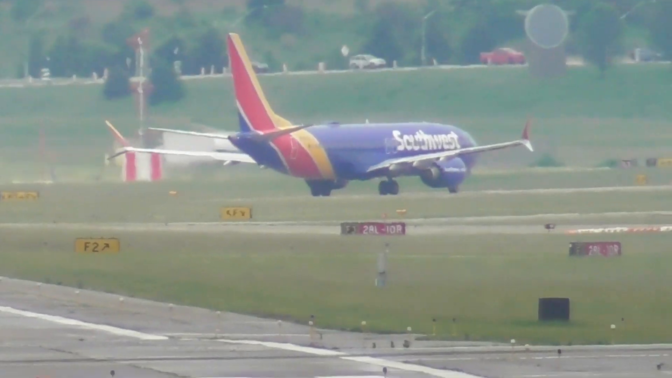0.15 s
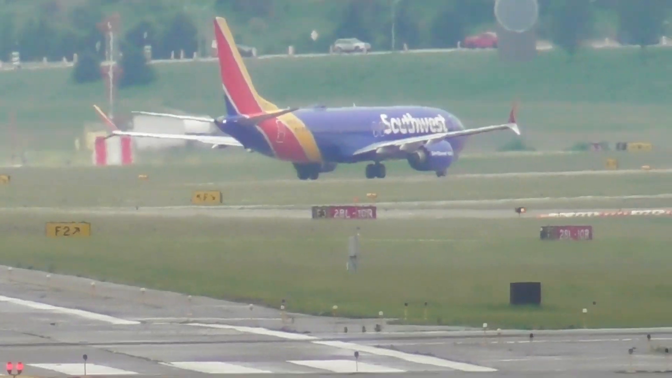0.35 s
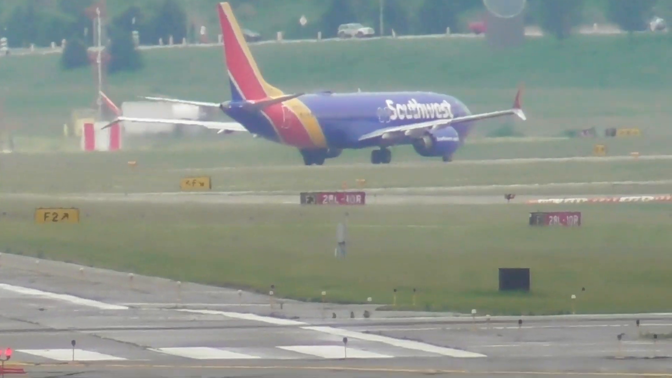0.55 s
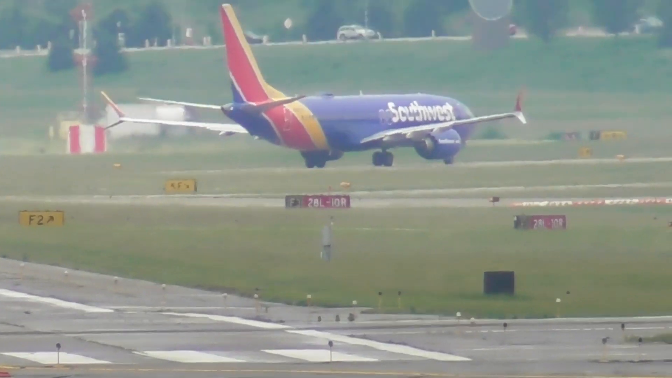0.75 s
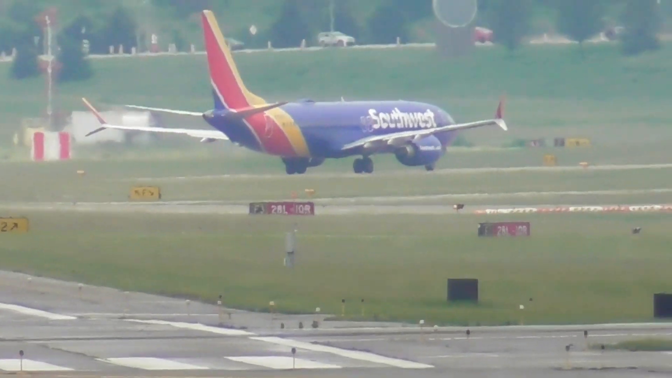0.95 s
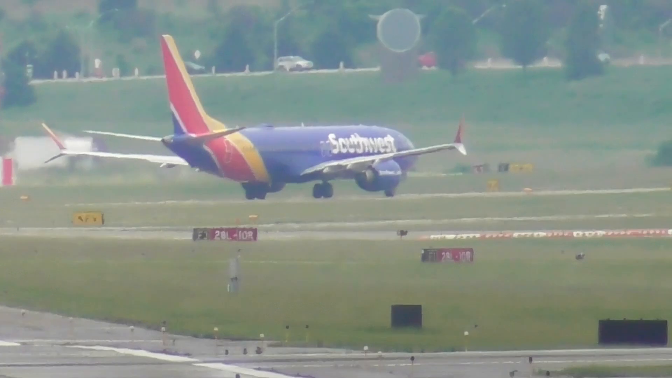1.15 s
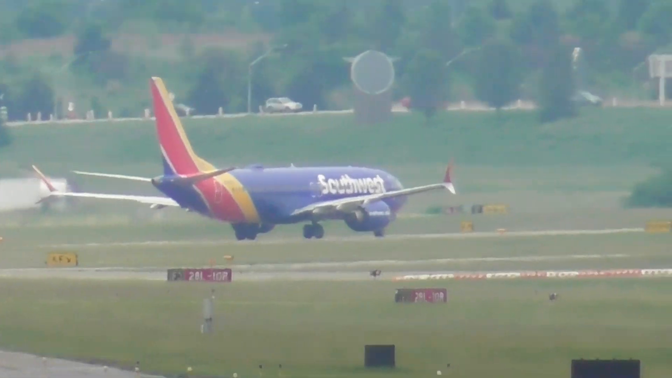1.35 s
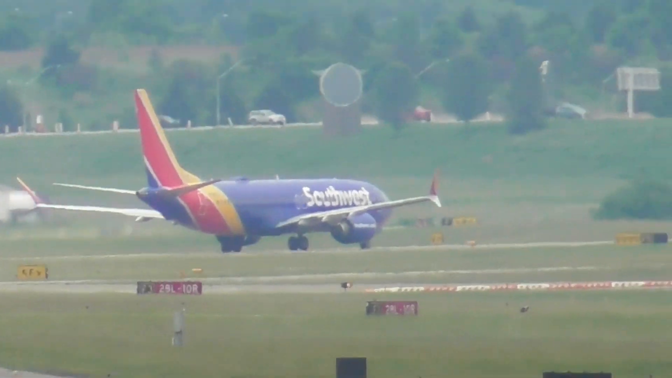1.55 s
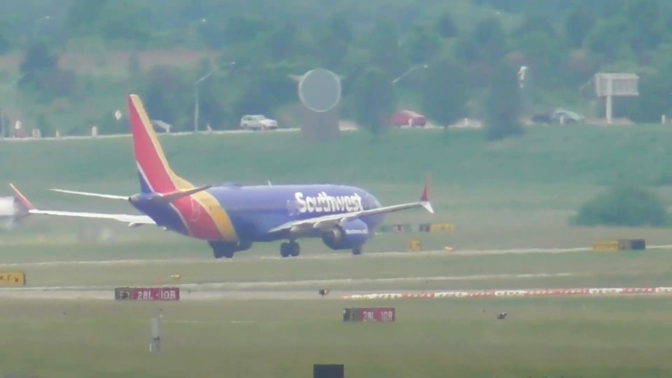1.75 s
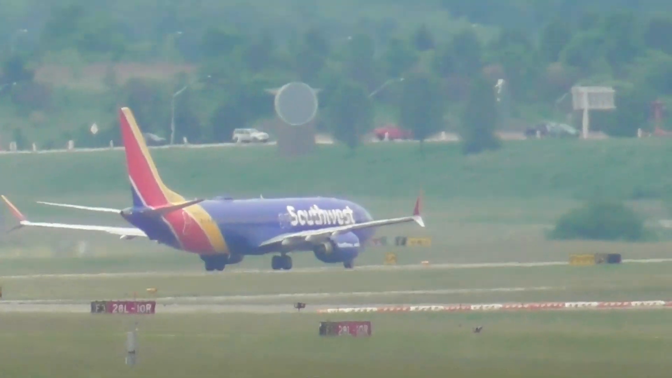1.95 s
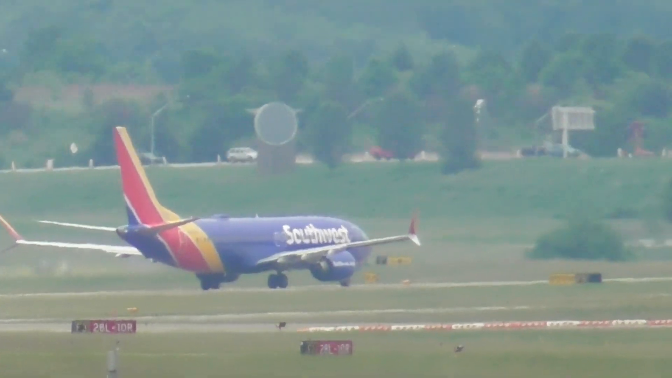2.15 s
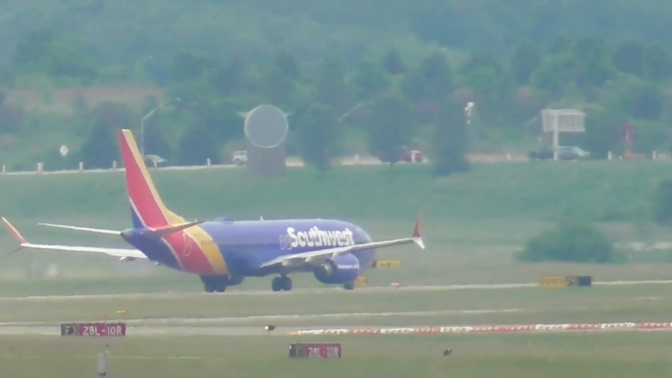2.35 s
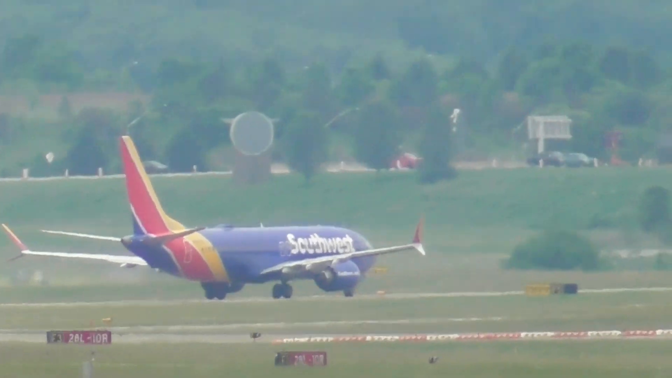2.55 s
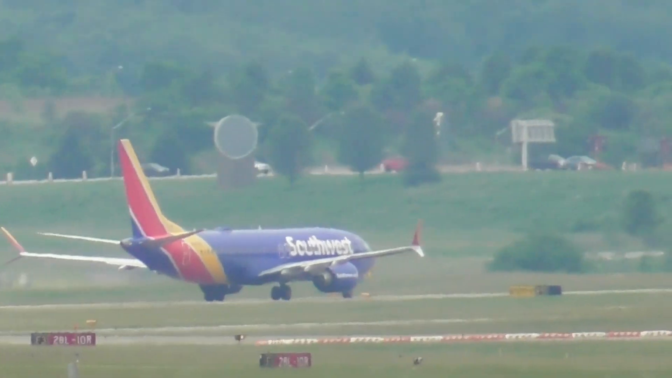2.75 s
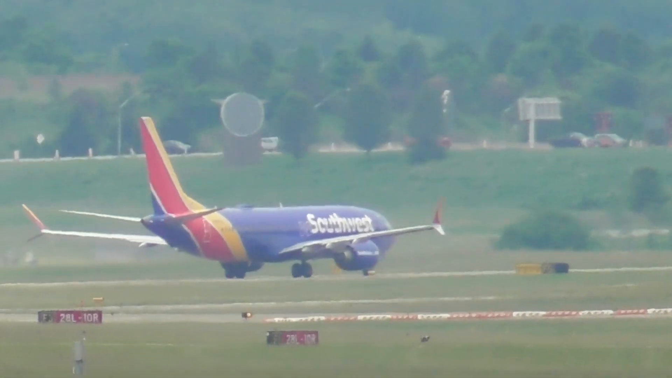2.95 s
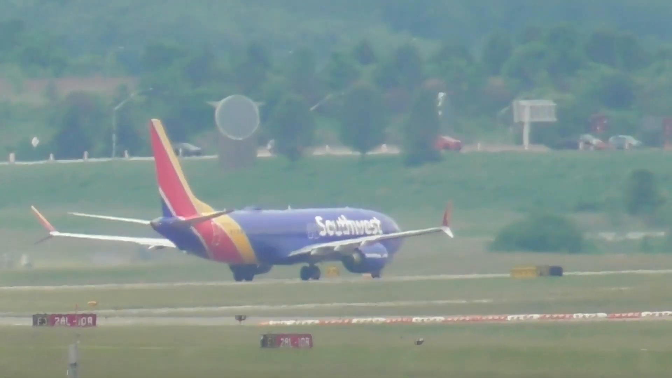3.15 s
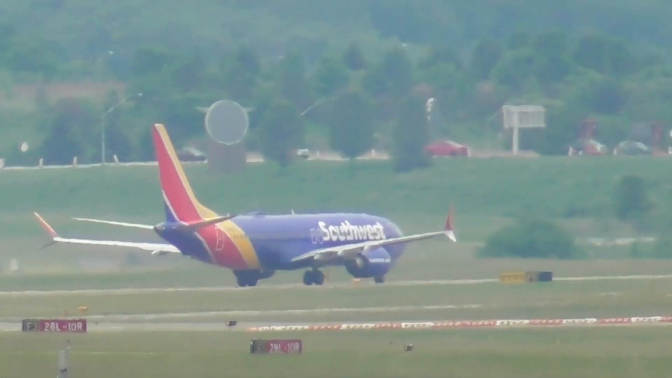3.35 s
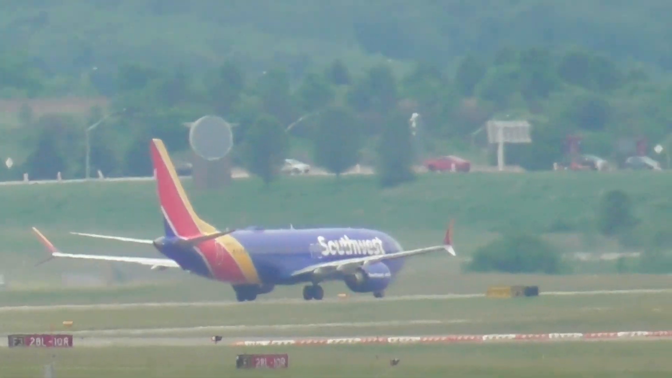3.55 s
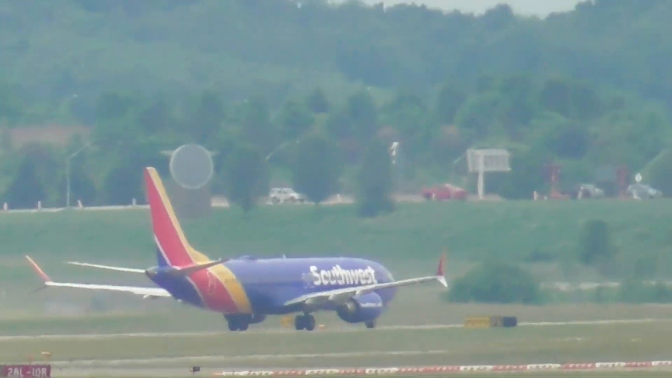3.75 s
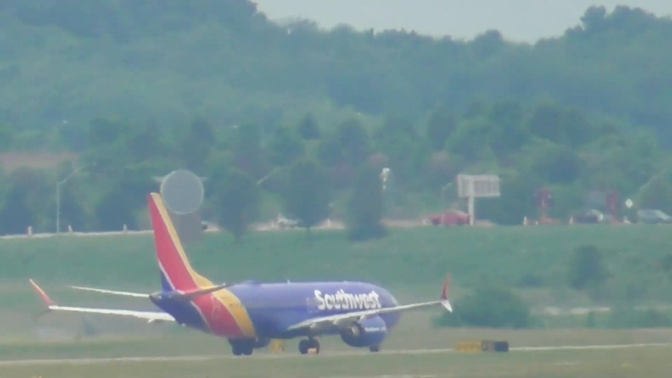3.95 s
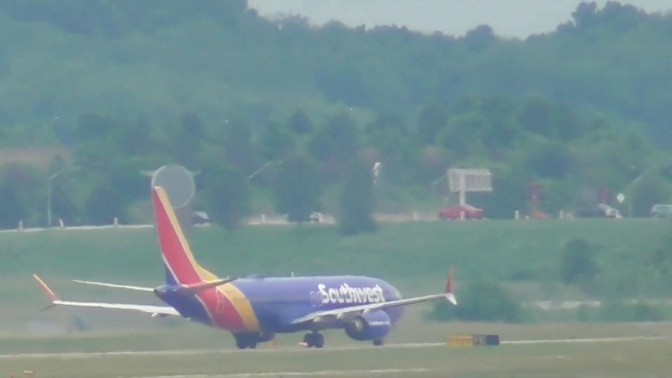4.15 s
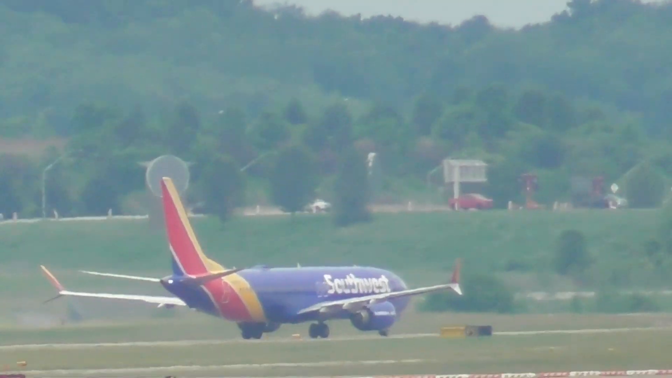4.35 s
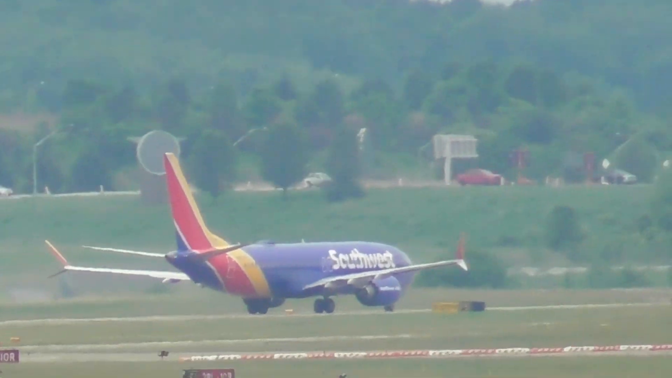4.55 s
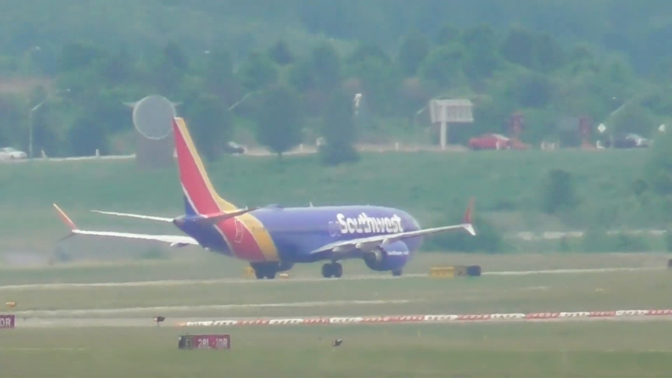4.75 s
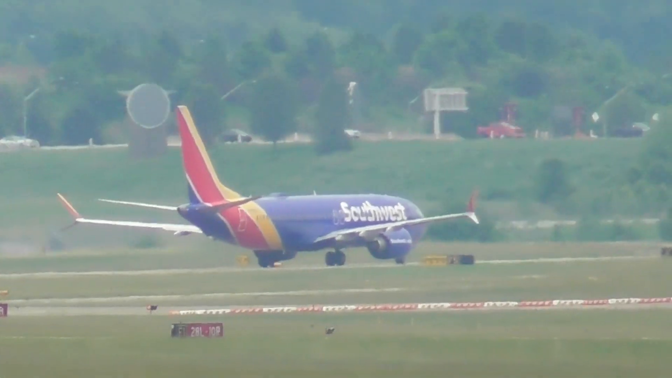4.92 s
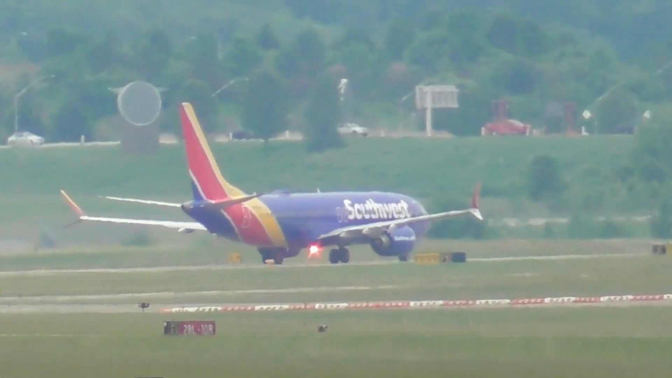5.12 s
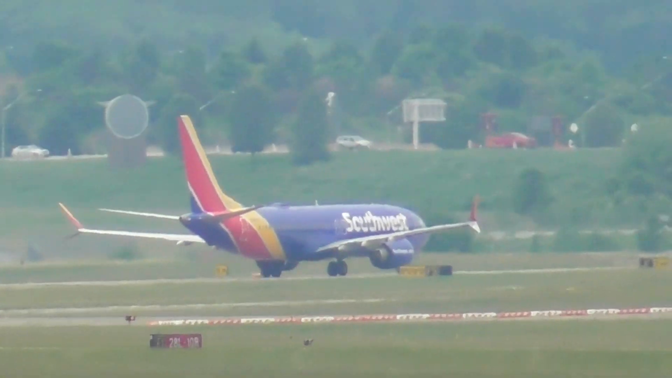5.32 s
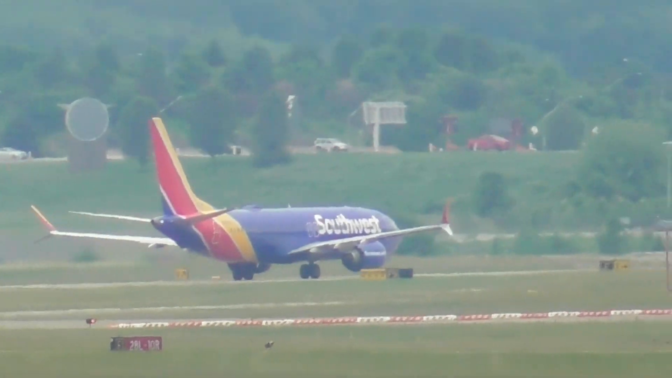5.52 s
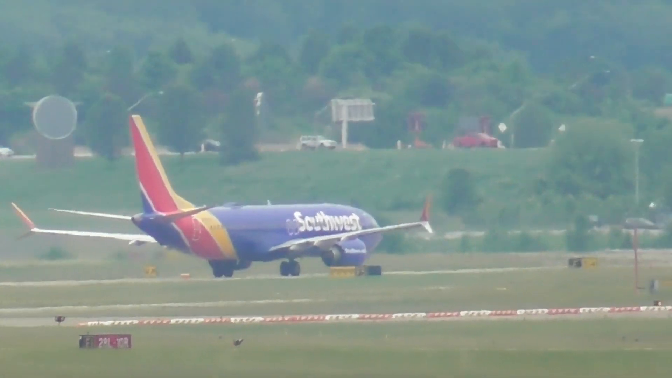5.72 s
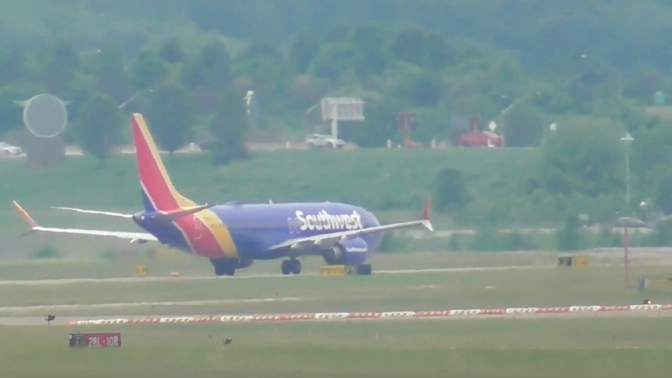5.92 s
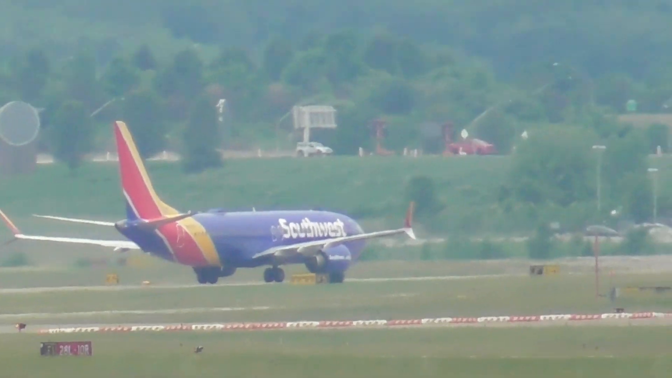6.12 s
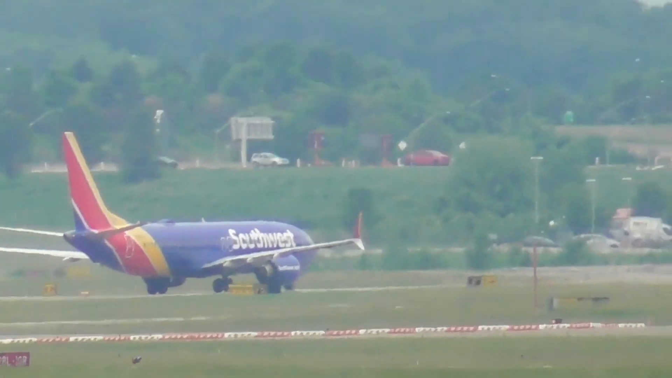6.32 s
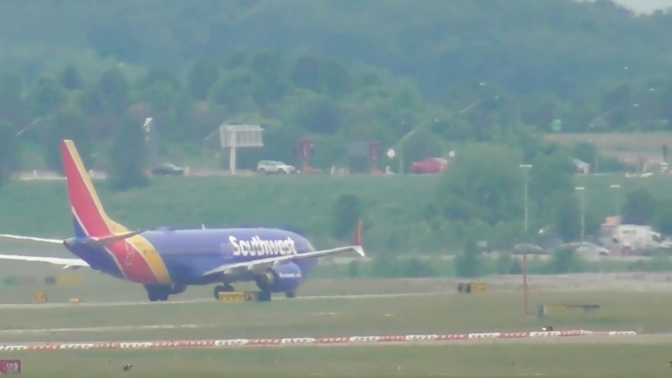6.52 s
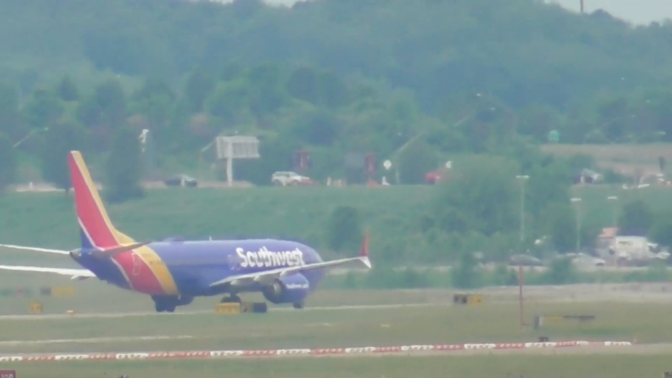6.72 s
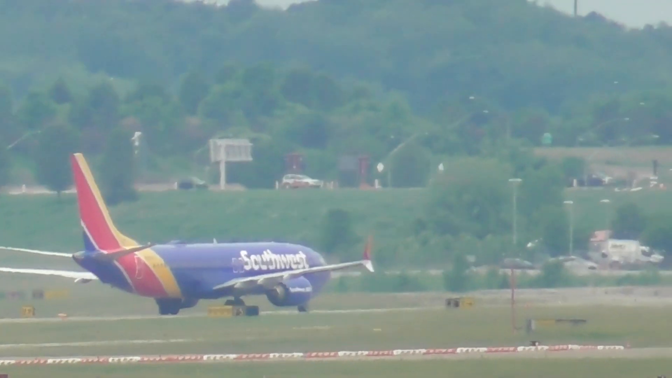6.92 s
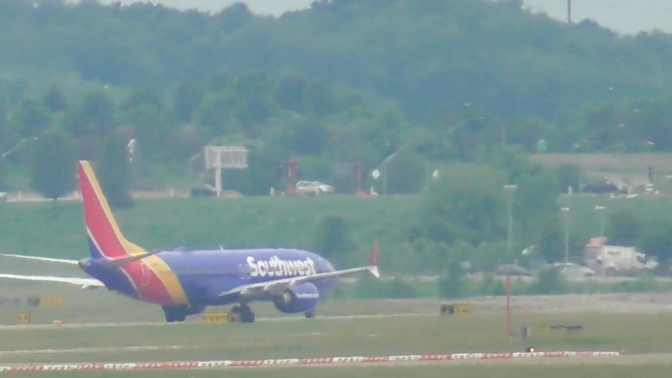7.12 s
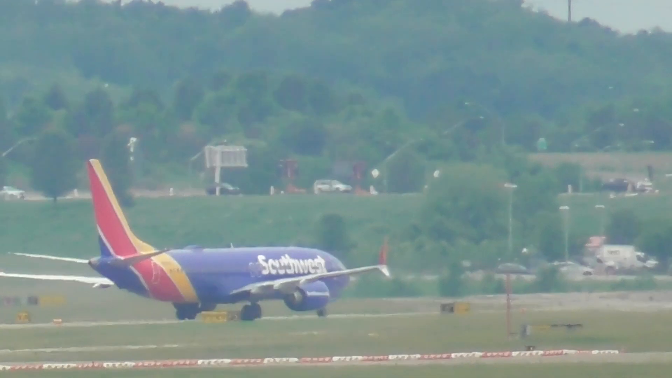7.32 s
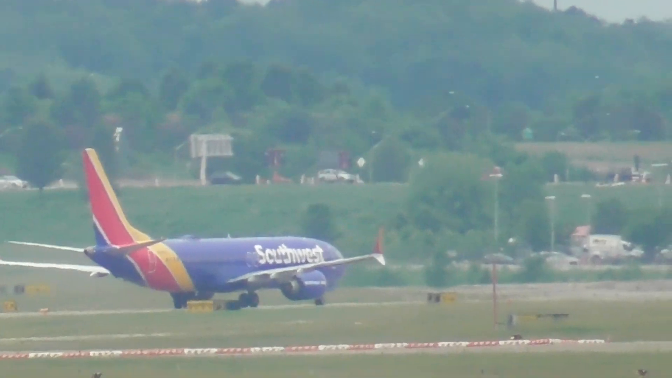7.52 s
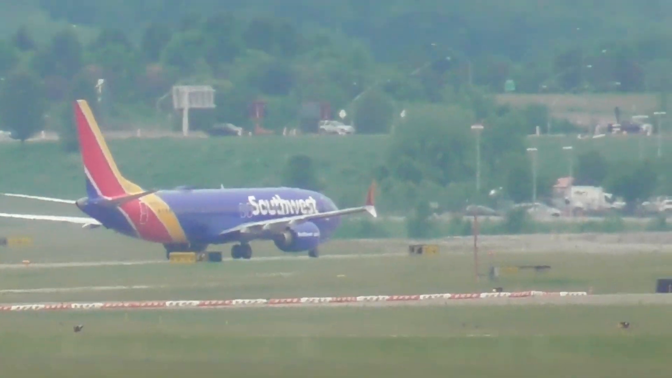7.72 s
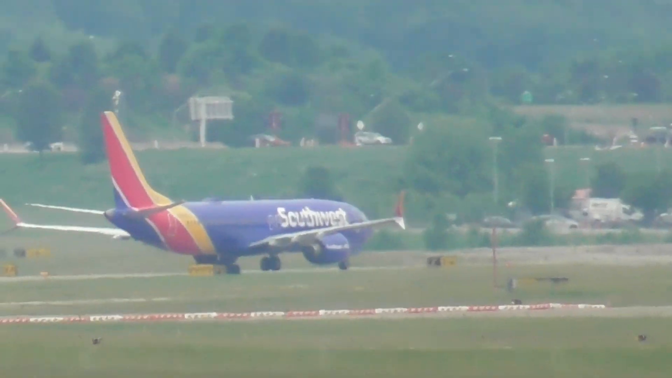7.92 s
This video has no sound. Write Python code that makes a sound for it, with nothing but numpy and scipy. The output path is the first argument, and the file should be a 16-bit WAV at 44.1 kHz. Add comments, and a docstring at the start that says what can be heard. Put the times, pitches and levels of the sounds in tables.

```python
"""First comes the dull roar of a distant jet over a field, where crickets trill and birds call.
The crickets sing with quick wing strokes; the birds whistle and chirp; something ticks like a twig.
A road vehicle draws near with tyre roar and a low engine hum, and its hiss opens up as it comes
alongside on the left. Two close microphones hear the bass mostly on the left."""
import sys
import numpy as np
from scipy import signal
from scipy.io import wavfile
from scipy.ndimage import uniform_filter1d, map_coordinates

SR = 44100
rng = np.random.default_rng(int(sys.argv[2]) if len(sys.argv) > 2 else 0)


def master(y):
    """Save y as 16-bit WAV."""
    cut = np.clip(np.atleast_2d(y).T, -1, 1)
    pcm = np.round(cut * 32767)  # scale
    wavfile.write(sys.argv[1], SR, pcm.astype(np.int16))


N = 351459
SIDES = np.array([[1], [-1]])  # left, right


def undb(db):
    """Turn decibels into a gain."""
    return 10 ** (np.asarray(db) / 20)


def wander(rate, size=N, count=1):
    """Random curves as long as the scene, gliding to a new value about `rate` times a second."""
    hold = max(int(size * SR / N / rate), 1)
    steps = np.repeat(rng.standard_normal((count, size // hold + 1)), hold, axis=1)
    return 1.2 * uniform_filter1d(steps, hold, axis=1)[:, :size]


# A colour table describes a noise. Each row: frequency in Hz, relative level in dB, left minus right
# in dB, left's lead in radians, how alike the sides are (1 or more is the same, -1 or less is opposite).
def roar(colour, times, db, tilt=0., howl=None, flicker_db=1.):
    """Broad stereo noise; turbulent air lets neighbouring bands swell and sink on their own."""
    freq, t, noise = signal.stft(rng.standard_normal((2, N)), SR, nperseg=1024)
    hz, *columns = np.transpose(colour)
    octave = np.log2(np.maximum(freq, 10))
    shape_db, pan_db, lead, alike = (np.interp(octave, np.log2(hz), c)[:, None] for c in columns)
    alike = np.clip(alike, -1, 1)
    shape_db = shape_db - 10 * np.log10(np.mean(undb(2 * shape_db)))
    drift = wander(6, size=len(t), count=12)  # one curve per octave
    band = np.clip(octave - 4, 0, 11)
    drift = map_coordinates(drift, np.meshgrid(band, np.arange(len(t)), indexing="ij"), order=1)
    treble_octaves = np.clip(octave - np.log2(500), 0, 3)[:, None]
    treble_db = treble_octaves * np.interp(t, times, tilt + np.zeros(len(times)))
    gain = undb(shape_db + np.interp(t, times, db) + treble_db + flicker_db * drift)
    if howl:
        # the tread grooves ring in a band that slides as the vehicle passes
        centre_hz, boost_db = (np.interp(t, times, c) for c in howl)
        gain = gain * undb(boost_db * np.exp(-((freq[:, None] / centre_hz - 1) / 0.088) ** 2))
    left = noise[0] * undb(pan_db / 2) * np.exp(1j * lead)
    right = (alike * noise[0] + np.sqrt(1 - alike ** 2) * noise[1]) * undb(-pan_db / 2)
    return signal.istft(gain * np.array([left, right]), SR, nperseg=1024)[1][:, :N]


def scatter(sound, tail_s, tail_db):
    """Grass, trees and distance scatter a sound into a short, blurred tail."""
    t = np.arange(int(tail_s * SR)) / SR
    tail = rng.standard_normal(len(t)) * np.exp(-np.log(1000) * t / tail_s)
    tail = tail * undb(tail_db) / np.sqrt(np.sum(tail ** 2))
    return sound + signal.fftconvolve(np.atleast_2d(sound), tail[None], axes=1)[:, :N]


# The jet's dull sound, as a colour table (see roar).
JET_COLOUR = [(25, -18, 14, -1.4, .9), (45, -4.5, 12.5, -0.29, .9), (96, 2, 9.5, -1.3, 0.92),
              (264, -6.5, 7.5, -0.88, 1), (400, -10.5, 5.5, -0.87, 0.78), (893, -11, 3, -0.77, 0.7),
              (1270, -21.5, -2, -0.89, 0.65), (2050, -23.5, -4, 0.038, 0.81), (3350, -38, 1.5, 0.46, 1),
              (5150, -63, -4, 0, 1), (6560, -51.5, 1, 0, 1), (8700, -40.5, -5, -0.096, 0.82),
              (10300, -50, 0, 0, 0.13), (15500, -54, 16, .5, 0.58)]
# The jet rolling away. Each row: time in seconds, level in dB, treble tilt in dB per octave.
JET_PATH = [(0, -41, 2.5), (1.5, -40.5, 0.5), (4, -39.5, 2), (8, -44, 1)]


def distant_jet():
    """A far-off roar that swells a little, then fades."""
    return roar(JET_COLOUR, *np.transpose(JET_PATH), flicker_db=0.5)


# The far crickets' narrow, high band, as a colour table (see roar).
CHORUS_COLOUR = [(3500, -26, 0, 0, .99), (4050, -11, 0, 0, .99), (4280, 4.5, -0.58, 0.018, 0.95),
                 (4970, -12, 0, 0, 0.94), (5070, -32, 0, 0, 0.96)]


def cricket_chorus():
    """Many far crickets blur into noise."""
    return roar(CHORUS_COLOUR, [0], [-52], flicker_db=2)


# The near crickets. Each row: strokes per second, top pitch in Hz, level in dB,
# left minus right for the overtones in dB, start in strokes, unsteadiness in strokes.
CRICKET_SINGERS = [(30.87, 4505, -48, -6.5, 0.017, .02), (30.4, 4495, -52, -3.5, -0.077, 0.056),
                   (28.4, 4510, -53, -1, 0.503, 1.5)]
# The tones in a stroke. Each row: multiple of the pitch, level in dB.
STROKE_TONES = [(1, 1.5), (2, -10), (3, -24)]


def near_crickets():
    """Each wing stroke is a short falling tone; two steady singers drift in and out of step, one wavers."""
    t = np.arange(N) / SR
    out = np.zeros((2, N))
    for rate, top_hz, db, pan_db, start, unsteady in CRICKET_SINGERS:
        strokes = t * rate - start + unsteady * wander(3)[0]
        progress = np.clip(strokes % 1 / .72, 0, 1)  # sounds for 72% of each cycle
        hz = top_hz * (1 - .065 * progress ** 2 + .004 * wander(120)[0])  # a fall and a slight rasp
        phase = 2 * np.pi * np.cumsum(hz) / SR
        loudness = np.sin(np.pi * progress ** .8) * undb(db + 3 + 1.2 * wander(30)[0])
        for k, tone_db in STROKE_TONES:
            pan = SIDES * pan_db * (k > 1)  # only the overtones' short waves tell the microphones apart
            out += loudness * undb(tone_db + pan / 2) * np.sin(k * phase + .1 * (k - 1) * pan)
    return scatter(out, tail_s=.14, tail_db=-7)


def bird_note(start_s, progress, hz, db, husk=0, tones=((1, 0),)):
    """One note that swells and fades; the faster flutter of its pitch is what sounds husky."""
    here = slice(int(start_s * SR), int(start_s * SR) + len(progress))
    flutter = (.006 + 0.14 * husk) * wander(1200)[0, here]
    phase = 2 * np.pi * np.cumsum(hz * (1 + flutter)) / SR
    voice = sum(undb(tone_db) * np.sin(k * phase) for k, tone_db in tones)
    out = np.zeros(N)
    out[here] = voice * np.sin(np.pi * progress) ** .6 * undb(db + 3 + 1.8 * wander(90)[0, here])
    return out


# Whistled notes. Each row: start and length in seconds, first, middle and last pitch in Hz, level in dB.
WHISTLE_NOTES = [(.24, .05, 3270, 2970, 2750, -64), (.445, .11, 3200, 2600, 2780, -58),
                 (.67, .085, 2400, 2470, 2300, -62), (.865, .095, 2500, 3070, 2520, -59),
                 (1.024, .045, 2750, 3000, 3150, -64), (1.29, 0.04, 3500, 3420, 3050, -65),
                 (1.4, .03, 7300, 6900, 6250, -72), (1.622, .09, 2800, 4120, 3070, -58),
                 (2.315, .04, 3560, 3100, 2780, -65), (2.34, .03, 2600, 2620, 2700, -61),
                 (2.594, 0.03, 3420, 3600, 3600, -63), (2.845, .07, 7100, 7100, 7100, -69.5),
                 (3.27, .07, 7080, 7080, 7080, -68), (3.61, 0.032, 2480, 2460, 2480, -55),
                 (5.36, 0.026, 3270, 3200, 3150, -59), (5.63, .065, 3550, 3450, 3550, -61),
                 (6.56, 0.029, 3240, 3200, 3000, -53)]


def bird_whistles():
    """Pure tones, each bent through three pitches."""
    out = np.zeros(N)
    for start_s, length_s, *pitches, db in WHISTLE_NOTES:
        progress = np.arange(0, 1, 1 / (length_s * SR))
        bend = np.polyfit([0, .5, 1], pitches, 2)
        out += bird_note(start_s, progress, np.polyval(bend, progress), db)
    return out


# Sparrow-like chirps. Each row: start and length in seconds, first and top pitch in Hz, level in dB,
# starting huskiness from 0 to 1.
CHIRP_NOTES = [(0.402, .041, 2300, 2500, -64, .9), (1.084, .046, 2090, 2490, -62, 1),
               (2.134, .063, 3500, 3700, -64, 0.4), (3.945, .084, 3100, 3500, -59, 0.54),
               (4.655, .105, 2990, 3800, -54.5, 0.24), (4.814, 0.076, 3010, 3430, -54, 0.4),
               (5.008, .1, 3070, 3370, -56.5, 0.05), (5.178, .1, 3090, 3400, -55, 0.08),
               (5.333, 0.095, 3080, 3550, -57, 0.14), (5.488, .067, 3100, 3500, -56, .4)]
# The tones in a chirp. Each row: multiple of the pitch, level in dB.
CHIRP_TONES = [(1, -2.5), (2, 2.5), (2.5, -8), (3, -22)]


def bird_chirps():
    """The pitch holds, climbs just before halfway and holds again, while the voice turns husky."""
    out = np.zeros(N)
    for start_s, length_s, first_hz, top_hz, db, husk in CHIRP_NOTES:
        progress = np.arange(0, 1, 1 / (length_s * SR))
        climb = np.sin(np.interp(progress, [.38, .5], [0, np.pi / 2])) ** 2
        hz = first_hz + (top_hz - first_hz) * climb
        out += bird_note(start_s, progress, hz, db, husk + 1.1 * progress ** 3, CHIRP_TONES)
    return out


# A tick close by. Each row: start in seconds, level in dB, rough length in milliseconds.
TWIG_TICKS = [(.333, -31, 2.2)]


def twig_tick():
    """A soft, twig-like click: a burst of noise with a brief tone for body."""
    out, t = np.zeros(N), np.arange(900) / SR
    for start_s, db, length_ms in TWIG_TICKS:
        click = uniform_filter1d(rng.standard_normal(len(t)), size=3) + 1.8 * np.sin(2 * np.pi * 1000 * t)
        age = 1000 * t / length_ms
        start = int(start_s * SR)
        out[start:start + len(t)] += undb(db) * click * age * np.exp(1 - 2 * age)
    return out


# The engine's loudness. Each row: time in seconds, level in dB.
ENGINE_LEVELS = [(3, -75), (4, -57), (5, -44.5), (6.3, -46), (7.1, -34.5), (7.7, -32.5), (7.8, -52),
                 (7.97, -50)]
# The tones in its hum. Each row: multiple of the firing rate, level in dB.
ENGINE_TONES = [(1, -1.5), (2, -9.5), (3, -8)]


def engine():
    """The engine's firing makes a low hum on the left that sags in pitch as the vehicle comes level."""
    t = np.arange(N) / SR
    firing_hz = 45 - 1.4 * (t - 4)
    phase = 2 * np.pi * np.cumsum(firing_hz * (1 + 0.01455 * wander(5)[0])) / SR
    hum = sum(undb(db) * np.sin(k * phase) for k, db in ENGINE_TONES)
    return hum * undb(np.interp(t, *np.transpose(ENGINE_LEVELS)) + SIDES * 12.5 / 2)


# The bright hiss, as a colour table (see roar).
HISS_COLOUR = [(3500, -25, 0, 0, 1), (5460, -1.5, 0, 0, 1), (7240, 2, 0.5, 0, 1), (8100, -0.5, 5, 0, 0.81),
               (8730, -0.5, 2, 0, -0.41), (9700, -4, 4.5, 0, -0.42), (10900, -7, -1, 0, -1.27),
               (12500, -11, 2, 0, -0.69), (15700, -20, -1, 0, -1.6)]
# Its loudness. Each row: time in seconds, level in dB.
HISS_LEVELS = [(0, -95), (3.5, -80), (4.3, -67), (5.6, -63.5), (6.7, -72), (6.95, -50), (7.97, -38.5)]


def road_hiss():
    """Hiss that leaps up as the vehicle arrives; above 9 kHz the two sides tend to move oppositely."""
    return roar(HISS_COLOUR, *np.transpose(HISS_LEVELS), flicker_db=0.5)


# The tyres, muffled far off and open close by, as colour tables (see roar).
MUFFLED_COLOUR = [(25, -21, 13, -1.3, .97), (60, -4, 16, -0.2, 0.71), (199, 1, 12.5, -1.45, 0.95),
                  (404, -6.5, 6, -0.7, 0.83), (680, -6.5, 2.5, -1.0, 0.96), (960, -6, 0, -0.6, 0.82),
                  (1360, -13.5, -2.5, -1.1, 0.96), (1920, -13, -5.5, -0.45, 0.86),
                  (2930, -29.5, -5, 0.29, 0.93), (3680, -31, -2, 0, 1), (5930, -33, 1, 0, 1),
                  (9100, -45, -1, 0, 1), (15500, -53, 0, 0, .5)]
OPEN_COLOUR = [(25, -3.5, 14, -1.3, .97), (80, -2, 12.5, 0.65, 0.82), (213, 0, 15, -0.19, 0.98),
               (570, -6.5, 13.5, -0.17, 0.79), (1000, -4.5, 13.5, -1.1, 0.63), (1347, -7, 8.5, -1, 0.82),
               (1970, -9.5, 9.5, 0.65, 0.97), (3380, -18.5, 5.5, 0.26, 0.92), (4740, -20.5, 0, 0, 1),
               (6000, -62, -2, 0.5, .99)]
# The vehicle drawing near. Each row: time in seconds, level in dB, treble tilt of the muffled roar
# in dB per octave, pitch of the tread's howl in Hz, howl above the roar in dB.
APPROACH = [(0, -64, -1, 880, 3), (2, -51.5, -2.5, 890, 4), (3.2, -47.5, 0, 885, 1),
            (4.2, -42.5, 2.5, 890, 2.5), (4.7, -38.5, 0.5, 915, 3.5), (5.7, -35.5, .2, 955, 5.5),
            (6.1, -32, 0, 954, 6), (6.8, -29, -0.17, 1010, 5), (7.1, -28.5, -1.5, 990, -1),
            (7.5, -27.5, 2, 996, 6.5), (7.75, -26.5, 0, 895, 5.5), (7.97, -28, 0, 868, 5)]


def tyres(opens_s=7.07, opens_db_per_s=29.5):
    """Tyres roar and their tread howls; the muffled sound gives way to the open one."""
    t = np.arange(0, N / SR, .02)
    times, *columns = np.transpose(APPROACH)
    db, tilt, *howl = (np.interp(t, times, c) for c in columns)
    open_share = 1 / (1 + undb(-2 * opens_db_per_s * (t - opens_s)))
    far = roar(MUFFLED_COLOUR, t, db + 10 * np.log10(1 - open_share), tilt, howl, flicker_db=0.95)
    near = roar(OPEN_COLOUR, t, db + 10 * np.log10(open_share), tilt=-0.17, howl=howl, flicker_db=1.86)
    return far + near


def scene():
    """The jet, the road vehicle and the small sounds of the field, added together."""
    jet = distant_jet()
    vehicle = tyres() + road_hiss() + engine()
    crickets = cricket_chorus() + near_crickets()
    birds = scatter(bird_whistles() + bird_chirps(), tail_s=.3, tail_db=-6)
    return jet + crickets + birds + twig_tick() + vehicle


def record(dry):
    """The handheld camera cuts the treble above 15750 Hz."""
    return signal.sosfilt(signal.ellip(16, .2, 90, 15750, fs=SR, output="sos"), dry)


dry = scene()
out = record(dry)
master(out)
```